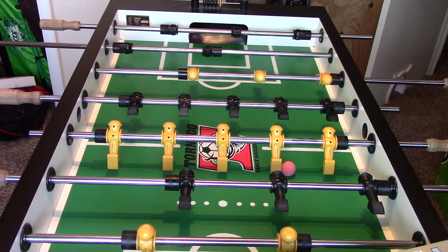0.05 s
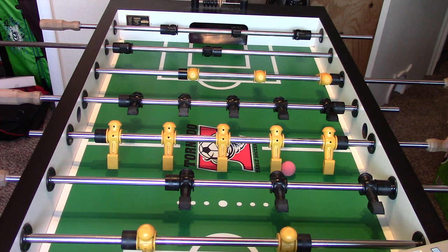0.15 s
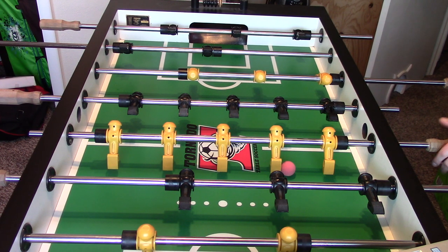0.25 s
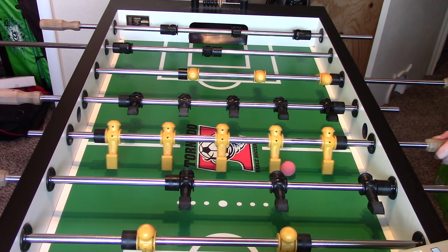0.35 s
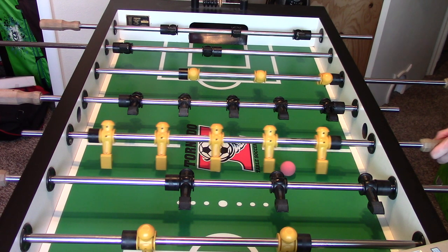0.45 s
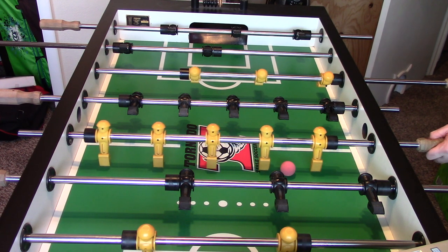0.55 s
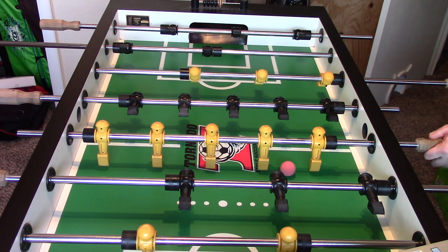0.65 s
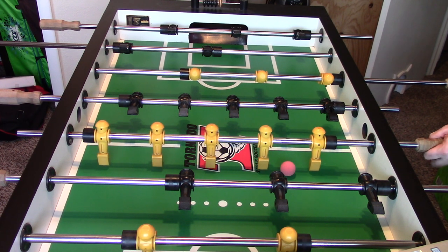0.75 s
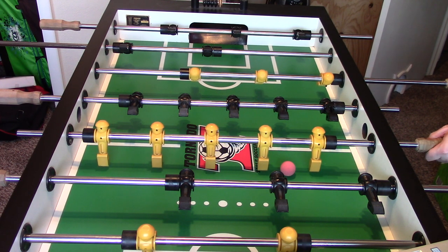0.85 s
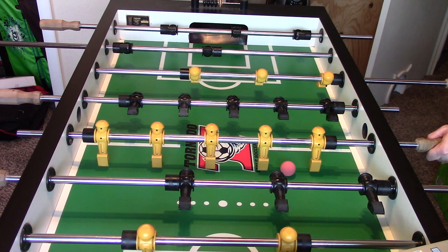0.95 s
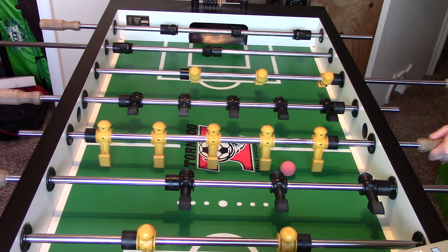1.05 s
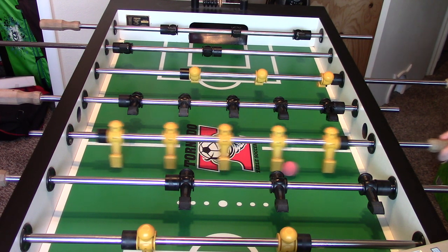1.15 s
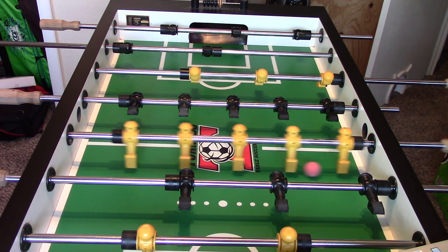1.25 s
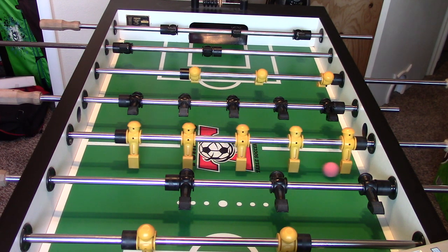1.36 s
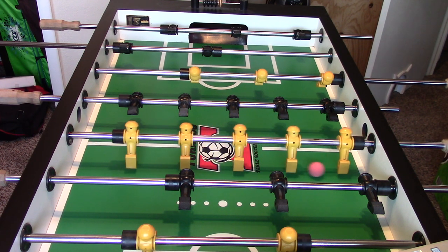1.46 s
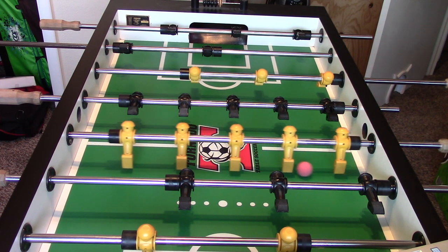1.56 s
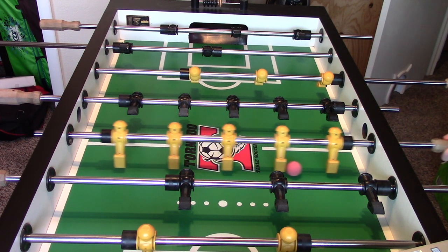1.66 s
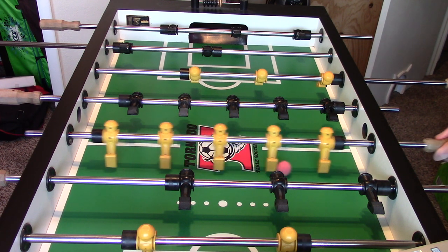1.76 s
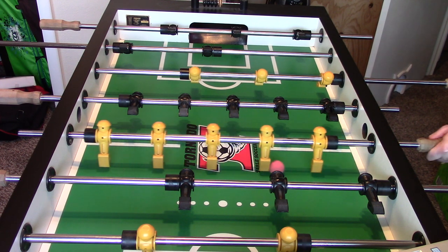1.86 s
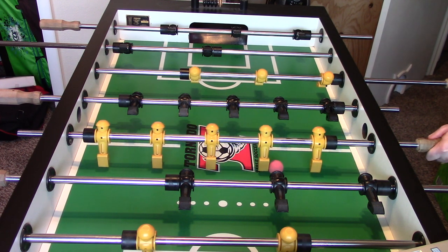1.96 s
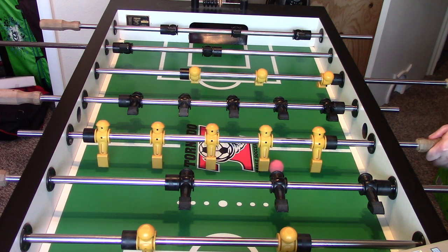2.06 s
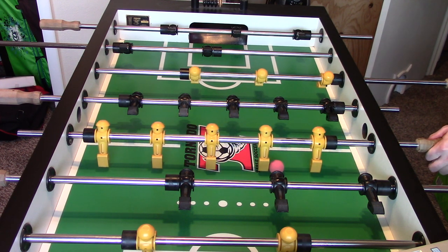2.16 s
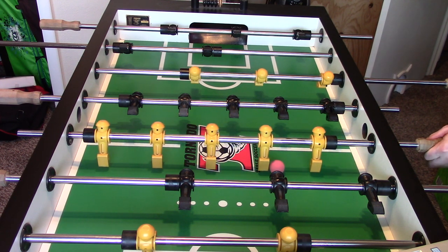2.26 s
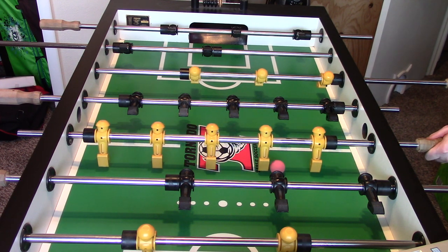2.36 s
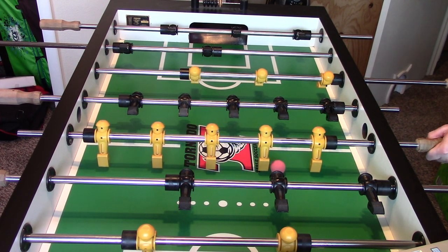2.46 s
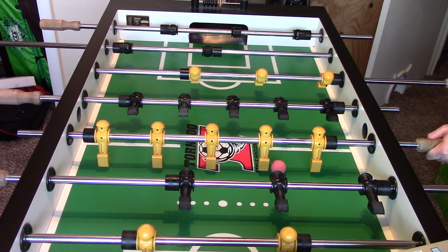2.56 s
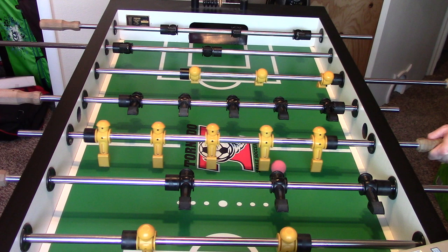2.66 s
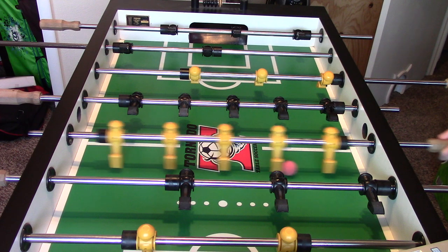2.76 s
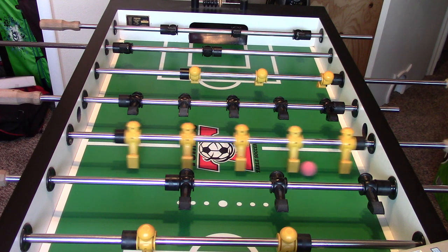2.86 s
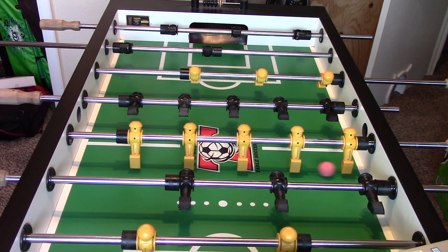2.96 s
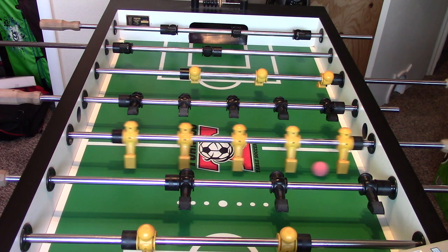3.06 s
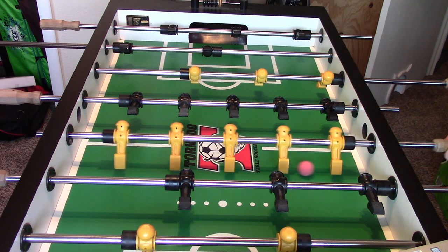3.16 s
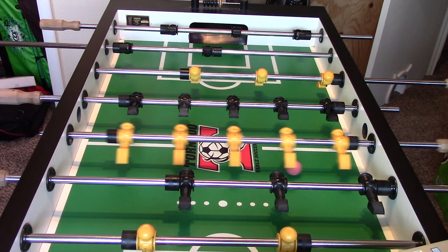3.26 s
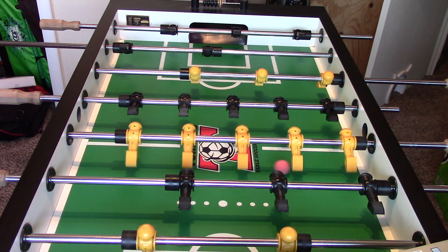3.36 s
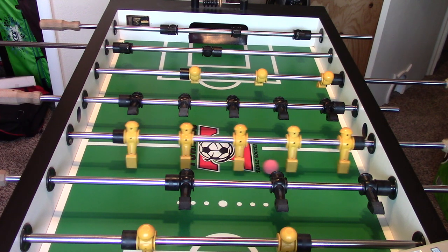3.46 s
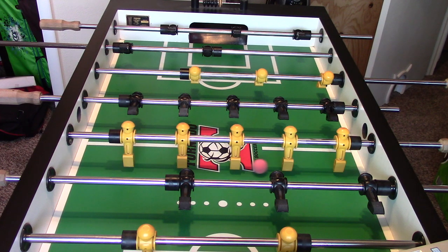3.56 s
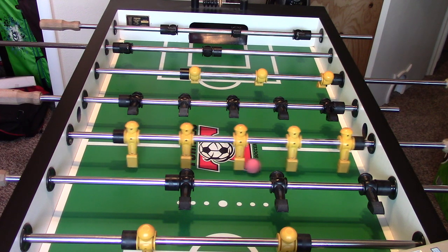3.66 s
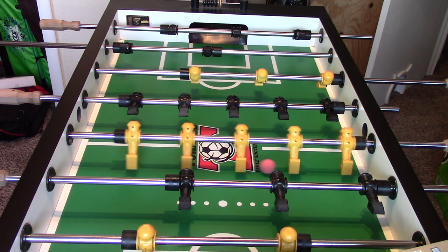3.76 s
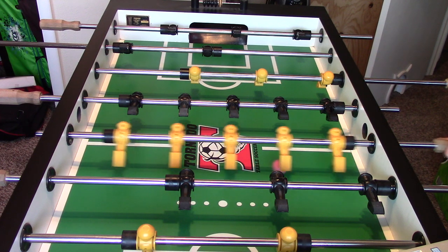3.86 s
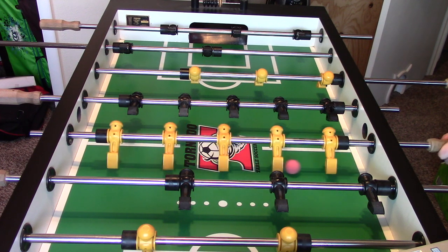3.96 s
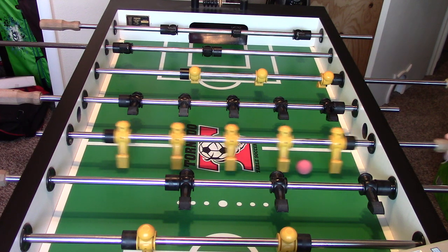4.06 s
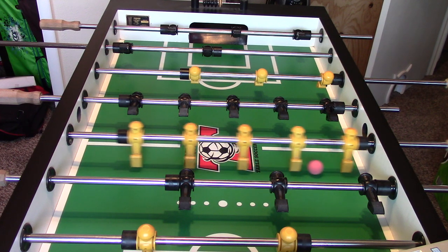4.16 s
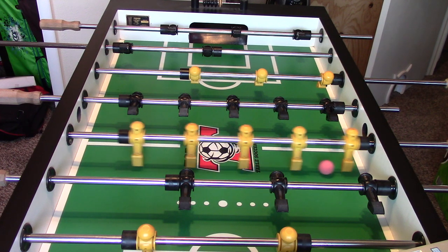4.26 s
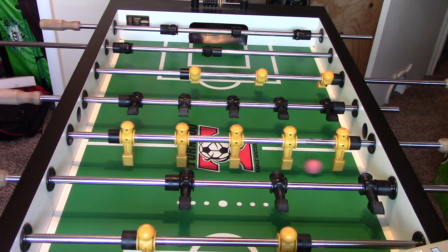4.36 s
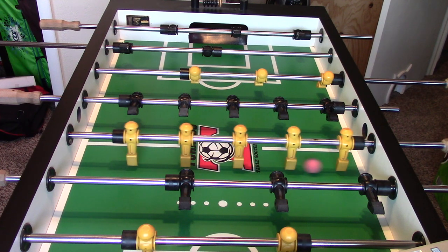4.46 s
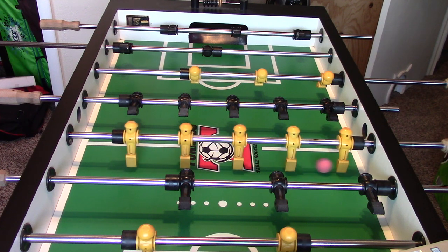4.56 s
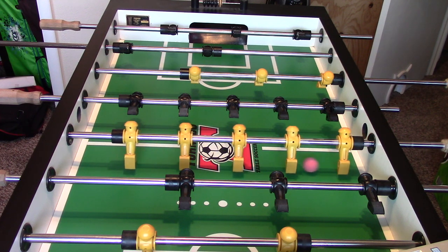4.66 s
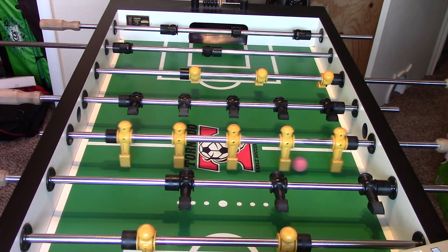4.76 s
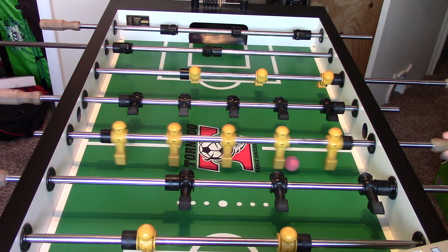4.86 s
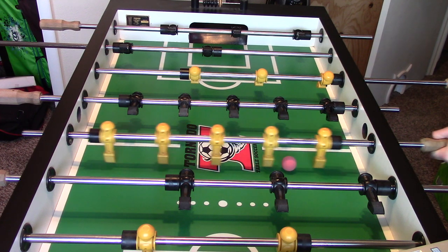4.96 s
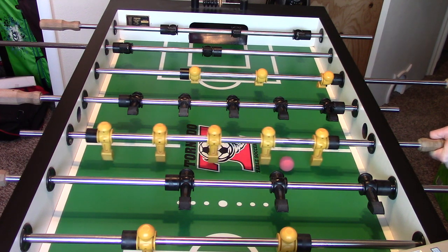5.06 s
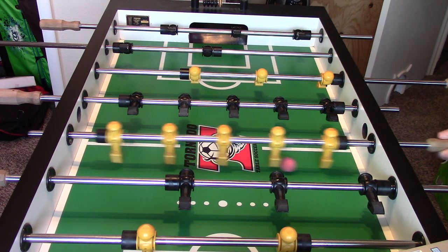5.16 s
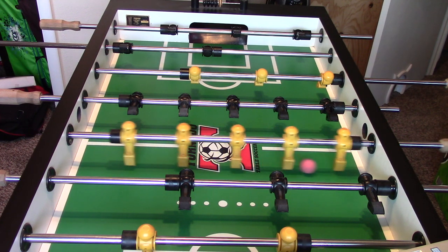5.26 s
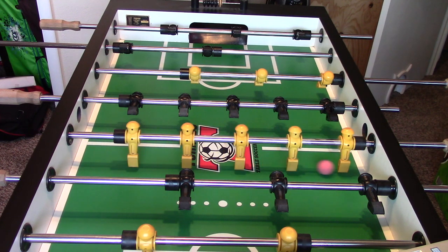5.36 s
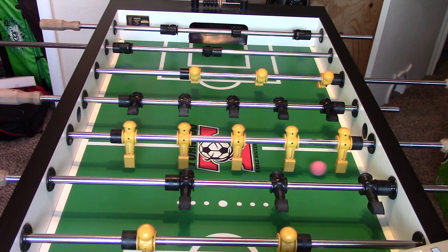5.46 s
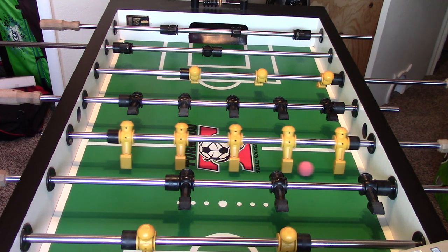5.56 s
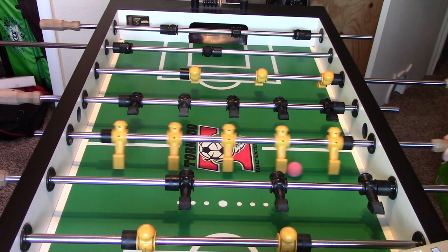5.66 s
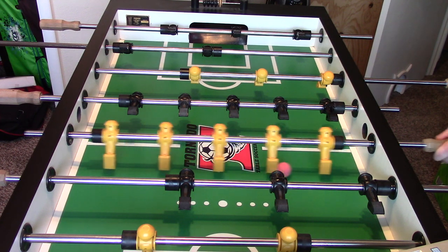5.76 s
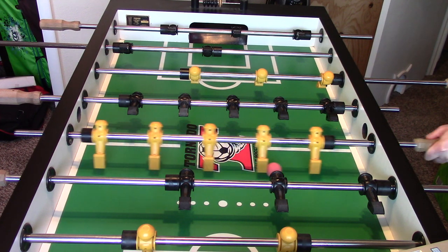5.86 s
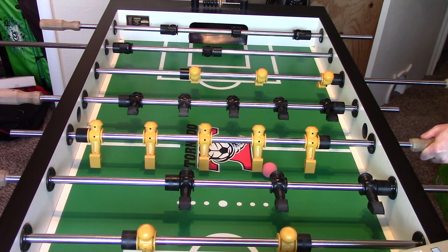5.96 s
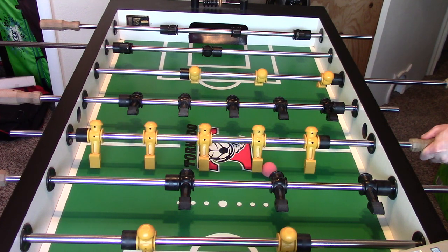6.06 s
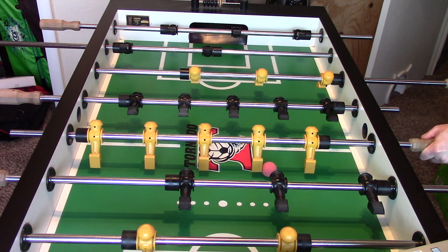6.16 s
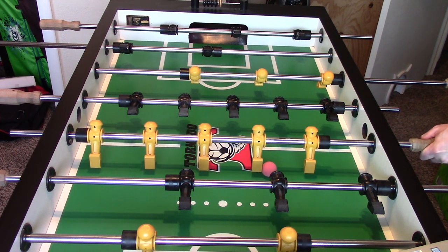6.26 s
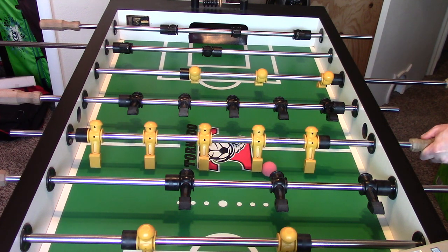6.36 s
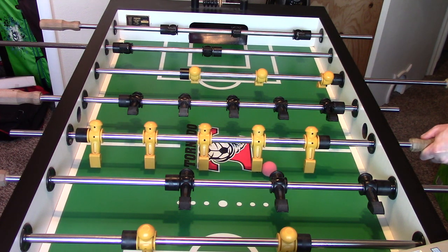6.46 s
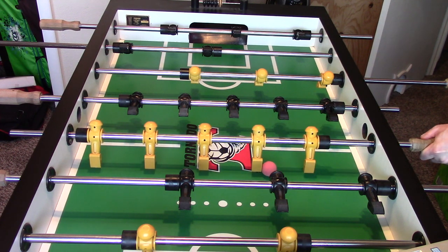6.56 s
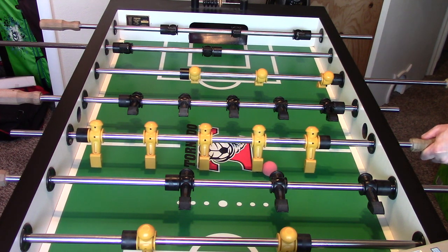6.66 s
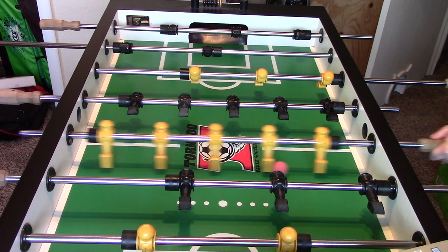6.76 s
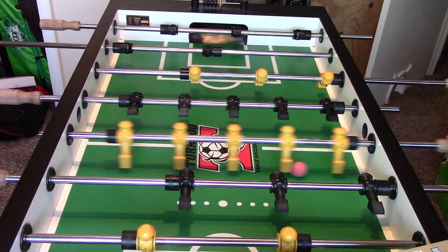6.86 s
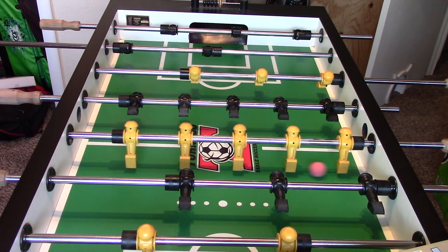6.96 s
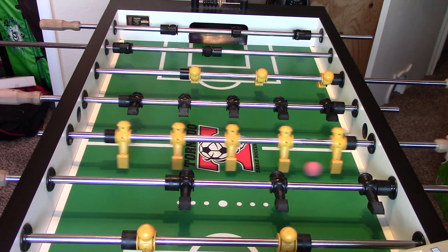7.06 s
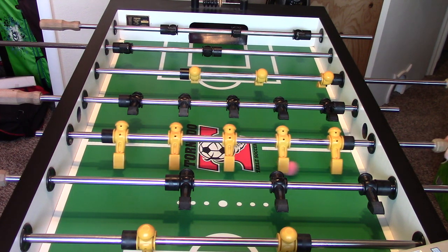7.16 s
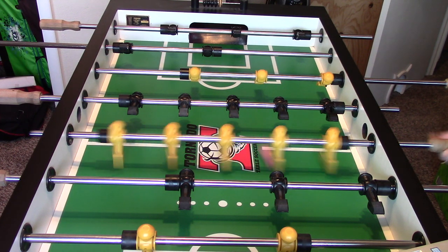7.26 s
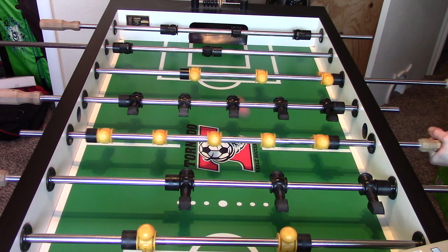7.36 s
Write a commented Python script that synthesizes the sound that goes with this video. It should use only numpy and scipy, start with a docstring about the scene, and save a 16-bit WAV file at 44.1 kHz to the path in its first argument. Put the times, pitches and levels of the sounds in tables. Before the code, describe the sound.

Table football up close: sliding steel rod, rolling ball, sharp plastic clacks and wooden thuds in a quiet humming room, finishing with a violent double bang.

```python
"""A hard ball is passed between the plastic men of one table-football rod in a small, quietly humming room.
The steel rod hisses in its bearings (shaped noise); rod on cabinet or skipping ball knocks dully (modes and noise).
The ball rumbles over the field (noise through the table's modes), and hard clacks of ball on foot add
a tick, the rod's bending note and the ring of hollow plastic.
At the end a hard shot and its rebound bang through the whole table and leave the rods chattering."""
import sys
import numpy as np
from scipy import signal
from scipy.fft import rfft, irfft, next_fast_len
from scipy.io import wavfile
from scipy.ndimage import uniform_filter1d

SR = 44100
rng = np.random.default_rng(int(sys.argv[2]) if len(sys.argv) > 2 else 0)


def wav_out(sig):
    """Save sig, one row per channel (or a flat mono array), as 16-bit PCM at SR to the path in sys.argv[1]."""
    wavfile.write(sys.argv[1], SR, np.round(np.clip(np.atleast_2d(sig).T, -1, 1) * 32767).astype(np.int16))


N = 326207
TIME = np.arange(N) / SR  # s, whole scene
AGE = np.arange(SR // 2) / SR  # s since a blow
SIZE = next_fast_len(N + SR, real=True)
BINS = np.arange(SIZE // 2 + 1) * SR / SIZE  # Hz


def undb(db):
    """Decibels to gain."""
    return 10 ** (np.asarray(db) / 20)


def at(table, hz):
    """Read (Hz, value) points on a log-frequency axis."""
    f, value = np.transpose(table)
    return np.interp(np.log(np.maximum(hz, 1)), np.log(f), value)


def unit(x):
    """Scale to rms 1."""
    return x / np.sqrt(np.mean(x ** 2))


def early(x):
    """Scale a blow to rms 1 over its first 25 ms."""
    return x / np.sqrt(np.mean(x[:SR // 40] ** 2))


def steady(x):
    """Even out the swells of a narrow-band sound over 40 ms, to rms near 1."""
    return x / np.sqrt(uniform_filter1d(x ** 2, size=SR // 25) + 1e-9)


def fade(t60):
    """Exponential decay by 60 dB in t60 seconds."""
    return np.exp(-np.log(1000) * AGE / t60)


def colour(x, table):
    """Filter a steady sound by (Hz, dB) points; rms 1."""
    spectrum = rfft(x, SIZE) * undb(at(table, BINS))
    return unit(irfft(spectrum, SIZE)[:N])


def walk(rate):
    """Random wander through `rate` points a second, with rms 1."""
    knots = TIME * rate
    points = np.arange(knots[-1] + 2)
    return unit(np.interp(knots, points, rng.standard_normal(len(points))))


def wavering_tone(hz, drift_hz, rate):
    """A sine whose pitch wanders around hz."""
    return np.sin(2 * np.pi * np.cumsum(hz + drift_hz * walk(rate)) / SR)


def add(track, s, sound):
    """Mix a sound in at time s."""
    i = int(s * SR)
    track[i:i + len(sound)] += sound[:N - i]


def struck(x, gain):
    """Filter a blow by gain(Hz) without ringing ahead of it (minimum phase)."""
    size = 4096
    cepstrum = irfft(np.log(gain(np.arange(size // 2 + 1) * SR / size)))
    folded = np.concatenate([cepstrum[:1], 2 * cepstrum[1:size // 2]])
    response = irfft(np.exp(rfft(folded, size)))
    return signal.fftconvolve(x, response)[:len(x)]


# spectrum of the room air: (f/Hz, relative level/dB)
AIR_COLOUR = [(25, -21), (60, -26.5), (95, -16), (125, -1.5), (160, -12.5), (270, -9.5), (450, -12.5),
              (600, -16), (1050, -19.5), (1500, -18.5), (2100, -24), (5000, -29.5), (10000, -36.5),
              (15000, -44.5)]
# faint wavering tones in the room: (f/Hz, level/dB)
ROOM_TONES = [(274.5, -73.5), (1270, -78), (1588, -77)]


def room(air_db=-58.0, hum_hz=124, hum_db=-66):
    """Quiet room air is shaped noise, under a wavering low hum and a few faint tones."""
    air = undb(air_db) * colour(rng.standard_normal(N), AIR_COLOUR)
    hum = wavering_tone(hum_hz, 2.55, 3.6) * undb(3.7 * walk(14.0))
    tones = sum(undb(db) * unit(wavering_tone(hz, 4, 9.8)) for hz, db in ROOM_TONES)
    return air + undb(hum_db) * unit(hum) + tones


# pushes and pulls of the rod through its bearings:
# (start t/s, length t/s, hiss level/dB at full speed before the gain in sliding)
STROKES = [(0.175, 0.67, -68), (1.034, 0.34, -66), (1.465, .48, -68), (1.997, 0.095, -68.5),
           (2.69, 0.23, -62), (3.031, 0.38, -66.5), (3.41, 0.15, -69), (3.6, 0.11, -66), (3.738, 0.23, -64),
           (3.987, 0.27, -66.5), (4.24, 0.2, -67), (4.67, 0.17, -68.5), (4.85, 0.21, -66),
           (5.043, .31, -65.5), (5.51, 0.5, -66), (6.671, 0.3, -64.5), (6.966, 0.28, -68.5)]
HISS_POWER = 0.46  # hiss grows as this power of the rod's speed


def rod_hiss():
    """Strength of the hiss: in each stroke the hand speeds the rod up and brakes it in half a sine."""
    strength = 0
    for s, length, db in STROKES:
        speed = np.abs(np.sin(np.pi * np.clip((TIME - s) / length, 0, 1)))
        strength = strength + undb(db) * speed ** HISS_POWER
    return strength


# spectrum of the sliding hiss: (f/Hz, relative level/dB)
SLIDE_COLOUR = [(200, 2.5), (700, 5), (1500, -6.5), (2100, 0), (2800, -10), (3700, -10.5), (5500, -11),
                (6500, -10.5), (7800, -8.5), (10000, -16), (15000, -26)]
# ring of the rod in its bearing: (f/Hz, relative level/dB per Hz)
BEARING_COLOUR = [(1200, -28), (2250, -15.5), (2550, 4.5), (2950, 3.5), (3300, -2.5), (4200, -15),
                  (7000, -29)]


def sliding(gain_db=8.0, flutter_db=2.7, ring_db=-62, knee_db=-72):
    """Steel rubs unevenly in the plastic bearings; their ring levels off as the rod speeds up."""
    strength = rod_hiss()
    hiss, rub = rng.standard_normal((2, N)) * undb(flutter_db * walk(25))
    moving = strength ** 2 / (strength ** 2 + undb(knee_db) ** 2)
    slide = strength * undb(gain_db) * colour(hiss, SLIDE_COLOUR)
    return slide + undb(ring_db) * moving * colour(rub, BEARING_COLOUR)


def contact(hz, cut_hz):
    """A soft contact lasts longer and gives little treble."""
    return 1 / np.sqrt(1 + (hz / cut_hz) ** 2 + (hz / cut_hz) ** 6)


# what the table rings with: (f/Hz, relative level/dB, t60 t/s); blows vary pitch and level a little
TABLE_MODES = [(141.2, 1.5, 0.42), (188.1, 0.5, 0.25), (263.9, 3.5, 0.16), (298.9, -4, 0.56),
               (357.8, 3.5, 0.23), (430.3, -4.5, 0.42), (533.4, 4.5, 0.31), (569, 1.5, 0.25),
               (600, 3.5, 0.19), (618.4, 1.5, 0.17), (675.8, 0, 0.14), (860, 0.5, 0.3), (927, -4, 0.25),
               (1035, 2, 0.099), (1059, -0.5, 0.095), (1182, 4.5, 0.23), (1259, -0.5, 0.2), (1355, 6, 0.21),
               (1517, -4, 0.35), (1807, 2, 0.21), (2277, -16, 0.098), (2470, -19, 0.27), (2660, -4, .22),
               (2870, -13, .2), (3060, 1.5, 0.26), (3350, 4, 0.21), (4660, 4.5, 0.12), (5030, -13, 0.16),
               (5750, 5, 0.13)]
# how long table and room ring: (f/Hz, t60 t/s)
DECAY = [(60, 0.5), (150, 0.34), (400, 0.34), (1000, 0.28), (2700, 0.24), (5000, 0.21), (12000, 0.56)]
BANDS = 44 * 2 ** np.arange(0, 9, .5)  # half-octave centres, Hz
FILTERS = [signal.butter(3, [f / 2 ** (1 / 4), f * 2 ** (1 / 4)], "band", fs=SR, output="sos") for f in BANDS]


def blow(shape, contact_hz, modes_db, first_db, first_t60, rise_s):
    """One impact: a direct burst, a dense tail of panels and room, and the table's clear modes."""
    swell = 1 - np.exp(-AGE / rise_s)  # the vibration spreads through the panels
    burst = undb(first_db) * fade(first_t60)
    out = np.zeros(len(AGE))
    noise = rng.standard_normal(SR * 2 // 3)  # longer than the blow, so the filters settle first
    for hz, sos in zip(BANDS, FILTERS):
        band = signal.sosfilt(sos, noise)[-len(AGE):]
        tail = band * swell * (fade(at(DECAY, hz)) + burst)
        out += unit(tail) * np.sqrt(hz / 135)  # wider bands hold more noise
    for hz, db, t60 in TABLE_MODES:
        # each blow drives the modes with other weights, phases and slightly other pitches
        cycles = hz * (1 + 0.0043 * rng.standard_normal()) * AGE + rng.random()
        mode = swell * fade(t60) * np.sin(2 * np.pi * cycles)
        out += unit(mode) * undb(modes_db + db + 2 * rng.standard_normal())
    return early(struck(out, lambda hz: undb(at(shape, hz)) * contact(hz, contact_hz)))


# dull knocks on the table, the rod against the cabinet or the ball skipping on the field:
# (t/s, level/dB, contact cut-off f/Hz)
KNOCKS = [(0.291, -48, 392), (0.345, -39, 335), (.497, -48, 450), (.627, -52, 600), (.771, -40.5, 580),
          (1.402, -23, 1750), (2.036, -52.5, 2474), (2.788, -30, 487), (2.897, -37, 680),
          (2.957, -33.5, 760), (3.027, -21.5, 2040), (3.166, -44, 500), (3.851, -40, 510),
          (4.243, -50.5, 597), (4.338, -20, 2180), (4.4588, -16, 3020), (4.561, -22.5, 1500),
          (5.281, -36, 920), (5.4248, -20, 2800), (6.909, -40, 520), (6.951, -35, 560),
          (7.0564, -17.5, 2700)]
# spectrum of a knock: (f/Hz, relative level/dB per Hz)
KNOCK_COLOUR = [(50, -29.5), (130, -17.5), (200, -18), (280, -1), (430, 1), (570, 1), (750, 2), (1250, -4),
                (1650, -10), (2100, -21), (4000, -20), (7000, -51), (15000, -46)]


def knocks():
    """Dull knocks on the table: rod against cabinet, or ball skipping; a softer contact sounds duller."""
    out = np.zeros(N)
    for s, db, contact_hz in KNOCKS:
        knock = blow(KNOCK_COLOUR, contact_hz, modes_db=-1.0, first_db=3.5, first_t60=0.16, rise_s=0.00031)
        add(out, s, undb(db) * knock)
    return out


# a touch sets the ball rolling until it stops or is touched again:
# (t/s, rumble level/dB, time it would take to stop t/s)
ROLLS = [(.346, -58, 2.1), (.771, -53.5, 0.26), (1.168, -37.5, 1.5), (1.378, -47.5, 0.83),
         (2.709, -40.5, 0.72), (3.008, -43, 1), (3.663, -45, 1.02), (4.315, -44, 0.93), (4.846, -58, 0.28),
         (5.163, -39.5, 1.6), (5.404, -43, 0.62), (6.65, -49.5, 1.1), (6.785, -37.5, 0.75)]
SPIN_UP_S = 0.031  # time the ball takes to pick up a push


def ball_rumble():
    """Strength of the rumble: each touch gives the ball a new speed, and friction takes it away evenly."""
    strength = np.zeros(N)
    for s, db, stop_s in ROLLS:
        speed = np.clip(1 - (TIME - s) / stop_s, 0, 1)
        strength = np.where(TIME >= s, undb(db) * speed, strength)
    step = 1 - np.exp(-1 / (SPIN_UP_S * SR))
    return signal.lfilter([step], [1, step - 1], strength)


# spectrum of the rolling ball: (f/Hz, relative level/dB)
ROLL_COLOUR = [(50, -37), (110, -18.5), (190, -2.5), (275, 7.5), (400, -2), (560, -21.5), (750, -24),
               (1200, -41), (2000, -55), (6000, -49)]
# what a fast ball adds: (f/Hz, relative level/dB per Hz)
FAST_COLOUR = [(60, -44), (200, -18), (400, -0.5), (580, 3), (750, -12.5), (1150, -22.5), (2000, -36),
               (6000, -78)]


def rolling(rough_db=2.35, modes_db=-2, fast_db=-38, fast_gain=1.4):
    """Tiny bumps under the ball shake the field with an even force; a faster ball sounds brighter."""
    strength = ball_rumble()
    bumps = rng.standard_normal(N)
    ring = sum(undb(db) * fade(t60) * np.sin(2 * np.pi * hz * AGE) for hz, db, t60 in TABLE_MODES)
    ringing = signal.fftconvolve(bumps, ring)[:N]
    field = colour(bumps, ROLL_COLOUR) + undb(modes_db) * colour(ringing, ROLL_COLOUR)
    speed = np.minimum(strength / undb(fast_db), 1)  # relative, read from the rumble strength
    rumble = unit(field) + fast_gain * speed * colour(rng.standard_normal(N), FAST_COLOUR)
    return strength * undb(rough_db * walk(30)) * steady(rumble)


# spectrum of the contact tick: (f/Hz, relative level/dB)
TICK_COLOUR = [(100, -36), (700, 0), (2700, 13), (4000, 10), (5200, 9.5), (6600, -6.5), (9500, -4.5),
               (11500, -10), (13500, -8), (16000, -13)]


def tick(contact_hz, snap_t60=0.0019, tail_db=-16, tail_t60=0.1):
    """The hard first contact: a snap of noise with a faint tail."""
    noise = rng.standard_normal(len(AGE)) * (fade(snap_t60) + undb(tail_db) * fade(tail_t60))
    return early(struck(noise, lambda hz: undb(at(TICK_COLOUR, hz)) / (1 + (hz / contact_hz) ** 2)))


def rod_ring(hz=487, t60=0.1, rise_s=0.0068, echo_s=0.0242, echo_db=3):
    """The rod's bending note, and its stronger, inverted return from the room."""
    def envelope(age):
        age = np.maximum(age, 0)
        return (1 - np.exp(-age / rise_s)) * np.exp(-np.log(1000) * age / t60)
    strength = envelope(AGE) - undb(echo_db) * envelope(AGE - echo_s)
    return early(strength * np.sin(2 * np.pi * hz * AGE))


# the hollow plastic man: (centre f/Hz, width f/Hz, relative level/dB, t60 t/s)
FIGURE_MODES = [(2640, 420, 7, 0.16), (2970, 180, -4, 0.083), (4800, 570, -4.5, 0.15)]


def figure_ring():
    """Clusters of close modes in the plastic man, as noise bands; each blow excites them differently."""
    out = 0
    for hz, width, db, t60 in FIGURE_MODES:
        sos = signal.butter(2, [hz - width / 2, hz + width / 2], "band", fs=SR, output="sos")
        band = signal.sosfilt(sos, rng.standard_normal(len(AGE)))
        out = out + undb(db) * early(band * fade(t60))
    return early(out)


# ball meets a foot or the wall:
# (t/s, level/dB, contact cut-off f/Hz, rod ring level/dB, plastic ring level/dB against the tick)
CLACKS = [(1.168, -28.5, 4470, -28, 6.5), (1.378, -24.5, 6860, -36, -2), (1.772, -55, 700, -50, 0),
          (1.857, -46, 700, -44, -2.5), (2.708, -30.5, 2250, -29.5, 4), (2.773, -37.5, 1890, -43, -5),
          (3.008, -24.5, 6470, -37, -8), (3.663, -26.5, 4450, -38.5, 1), (4.315, -26.5, 8950, -39, 9.5),
          (4.4273, -23.5, 19000, -55, 6), (4.5465, -24, 5500, -53, -9), (4.8465, -36.5, 1870, -41, -13),
          (5.163, -27, 4400, -28.5, 1), (5.4042, -25, 6900, -47, -1.5), (5.841, -58, 600, -52.5, 0),
          (7.0277, -20.5, 8300, -36, -4)]
# spectrum of a clack: (f/Hz, relative level/dB per Hz)
CLACK_COLOUR = [(50, -52), (150, -21), (270, -4.5), (600, -0.5), (800, -4), (1100, -6), (1700, -11),
                (2700, -10), (3400, -13.5), (4000, -16.5), (4800, -13.5), (5700, -19.5), (6400, -37),
                (15000, -71)]
TICK_DB, HARD_HZ = -10, 3760  # hardest tick against its clack; contacts with a lower cut-off hardly tick


def clacks():
    """The ball strikes foot or wall, exciting table, rod and plastic man; a harder contact ticks more."""
    out = np.zeros(N)
    for s, db, contact_hz, ring_db, plastic_db in CLACKS:
        snap = undb(db + TICK_DB) / (1 + (HARD_HZ / contact_hz) ** 3)
        clack = blow(CLACK_COLOUR, contact_hz, modes_db=1.5, first_db=-25, first_t60=0.12, rise_s=0.002)
        add(out, s, undb(db) * clack)
        add(out, s, snap * tick(contact_hz))
        add(out, s, undb(ring_db) * rod_ring())
        add(out, s, snap * undb(plastic_db) * figure_ring())
    return out


def rattle(rate=260, spread_db=5, t60=1.0):
    """The shaken rods chatter in their bearings: a dying shower of tiny clicks."""
    shape = [(500, -21), (3500, 3), (4700, -1), (6000, -1), (8000, -7), (11000, -25), (15000, -25)]  # Hz, dB
    hits = rng.random(len(AGE)) < rate / SR  # rate is clicks a second
    clicks = hits * undb(spread_db * rng.uniform(-0.75, 1, len(AGE))) * fade(t60)
    click = rng.standard_normal(len(AGE)) * (fade(0.0039) + 0.083 * fade(0.11))
    chatter = signal.fftconvolve(clicks, click)[:len(AGE)]
    return unit(struck(chatter, lambda hz: undb(at(shape, hz))))


# the shot and its rebound: (t/s, level/dB, contact cut-off f/Hz, sharp tick level/dB)
SHOT = [(7.2529, -11, 1790, -29), (7.2652, -8.5, 6260, -39)]
# spectrum of the shot: (f/Hz, relative level/dB per Hz)
SHOT_COLOUR = [(30, -32), (70, -18), (180, -8), (270, 1.5), (400, 4.5), (560, 2.5), (800, 0), (1300, -3),
               (1900, -5.5), (2600, -18), (4700, -25.5), (6000, -47), (8500, -35), (15000, -38)]
# the shot heaves the whole playing field: (f/Hz, level/dB, t60 t/s)
HEAVE = [(78, -48, .22), (274, -5, 0.067)]


def shot(rattle_db=-52, shot_tick_hz=6000):
    """The shot and its rebound bang the table, heave the field in low modes and rattle the rods."""
    out = np.zeros(N)
    for s, db, contact_hz, tick_db in SHOT:
        bang = blow(SHOT_COLOUR, contact_hz, modes_db=-2, first_db=-18.5, first_t60=0.023, rise_s=0.00092)
        add(out, s, undb(db) * bang)
        add(out, s, undb(tick_db) * tick(shot_tick_hz))
    heave = sum(undb(db) * fade(t60) * np.sin(2 * np.pi * hz * AGE) for hz, db, t60 in HEAVE)
    heave = heave * (1 - np.exp(-AGE / .001))  # soft onset
    add(out, SHOT[0][0], heave + undb(rattle_db) * rattle())
    return out


# stereo width of the room air: (f/Hz, side minus mid level/dB)
ROOM_WIDTH = [(60, 1), (99, -25), (160, -13), (270, -10), (450, -7), (750, -5.5), (1230, -10), (2040, -9),
              (3380, -8.5), (5600, -11)]
# stereo width of the table sounds: (f/Hz, side minus mid level/dB)
TABLE_WIDTH = [(30, -7), (120, -53), (250, -44), (500, -31.5), (1000, -22.5), (2000, -19), (4000, -15.5),
               (12000, -25)]


def scene(reflection_t60=0.056):
    """Two close microphone ports hear nearly the same; side reflections and diffuse room air part them a little."""
    table = sliding() + knocks() + rolling() + clacks() + shot()
    reflections = rfft(rng.standard_normal(len(AGE)) * fade(reflection_t60), SIZE)
    reflections = reflections / np.sqrt(np.mean(np.abs(reflections) ** 2))
    table_side = rfft(table, SIZE) * reflections * undb(at(TABLE_WIDTH, BINS))
    room_side = rfft(room(), SIZE) * undb(at(ROOM_WIDTH, BINS))
    side = irfft(table_side + room_side, SIZE)[:N]
    mid = table + room()
    return np.array([mid + side, mid - side])


def record(dry, low_hz=52, top_hz=15700, ceiling=.95):
    """The camera rounds the loudest peaks, thins the deep bass and cuts the top."""
    rounded = dry / (1 + (dry / ceiling) ** 4) ** (1 / 4)
    thinned = signal.sosfilt(signal.butter(2, low_hz, "high", fs=SR, output="sos"), rounded)
    return signal.sosfilt(signal.ellip(8, .2, 70, top_hz, fs=SR, output="sos"), thinned)


dry = scene()
out = record(dry)
wav_out(out)
```